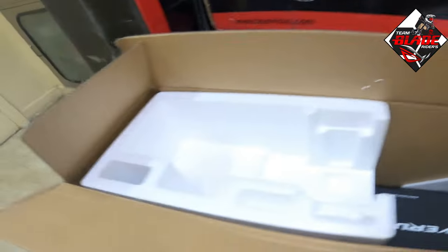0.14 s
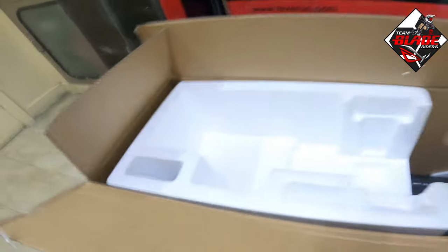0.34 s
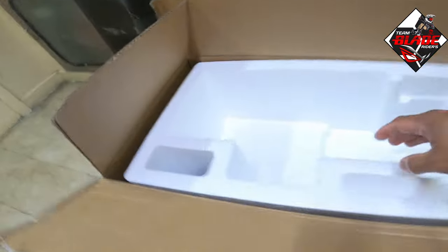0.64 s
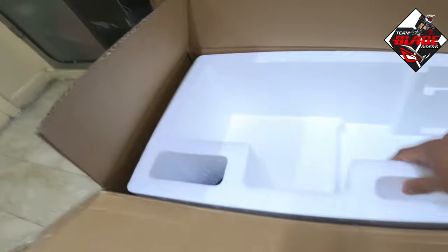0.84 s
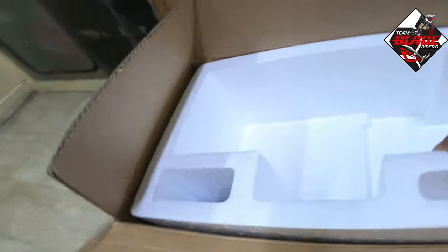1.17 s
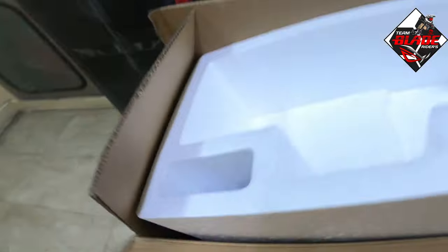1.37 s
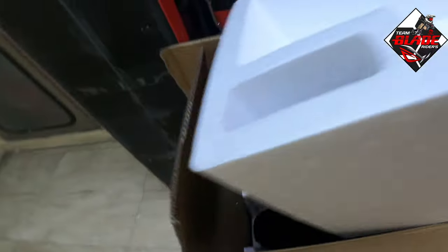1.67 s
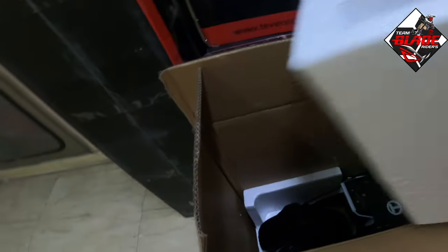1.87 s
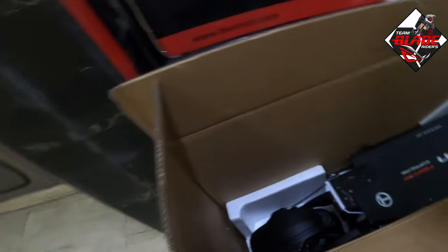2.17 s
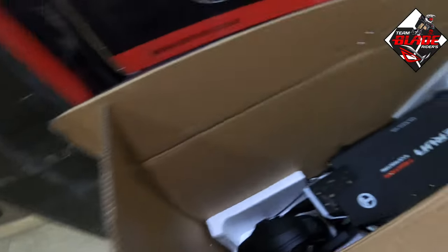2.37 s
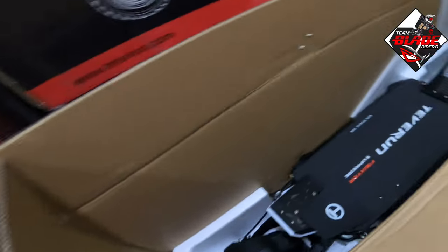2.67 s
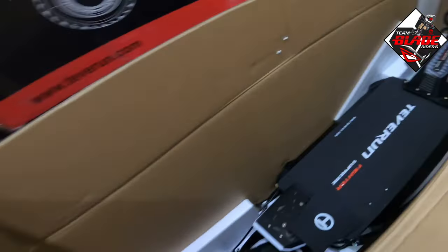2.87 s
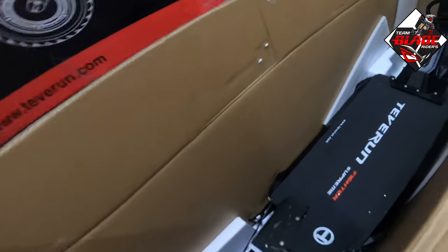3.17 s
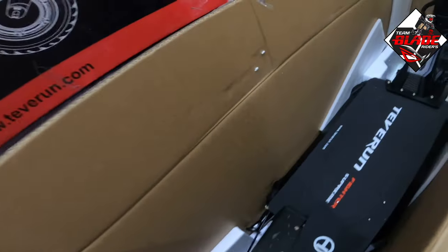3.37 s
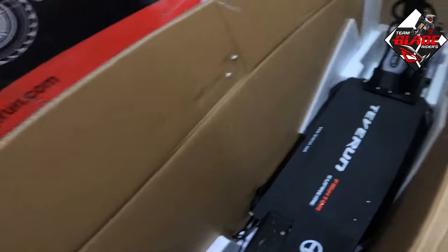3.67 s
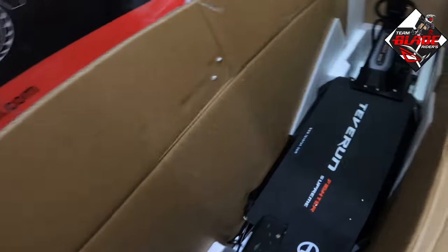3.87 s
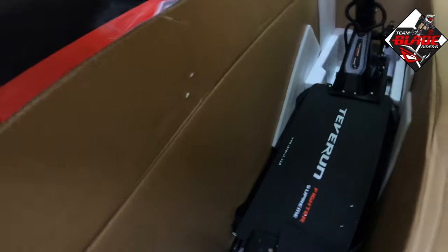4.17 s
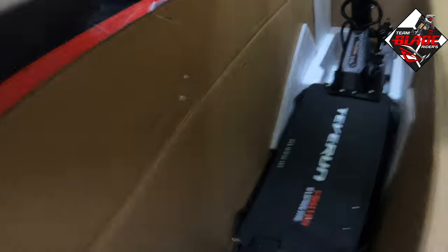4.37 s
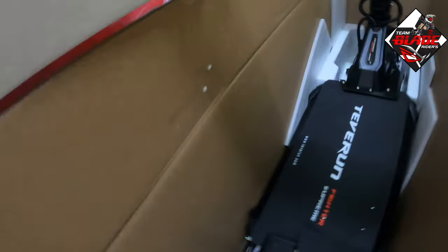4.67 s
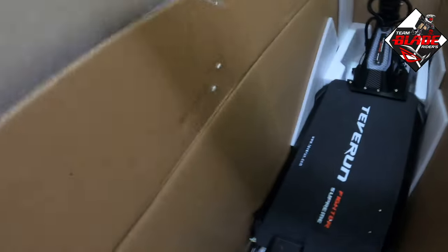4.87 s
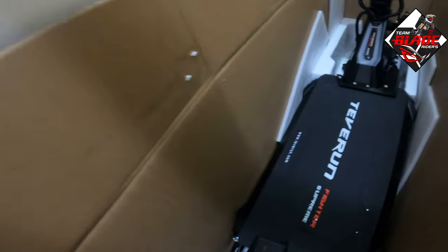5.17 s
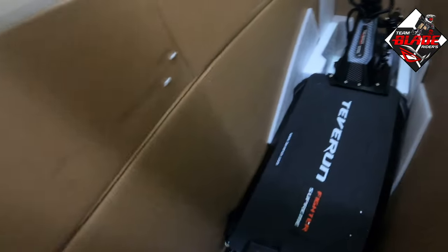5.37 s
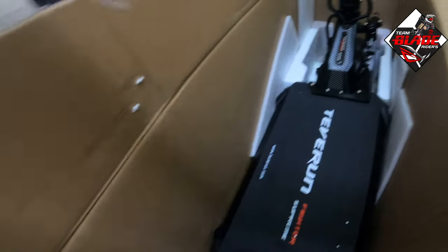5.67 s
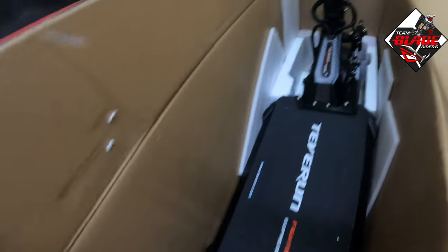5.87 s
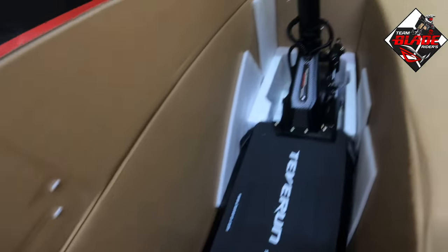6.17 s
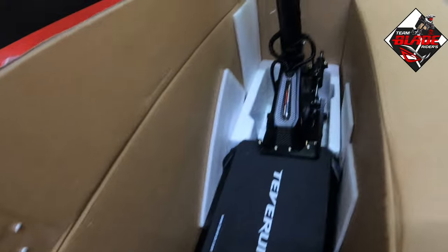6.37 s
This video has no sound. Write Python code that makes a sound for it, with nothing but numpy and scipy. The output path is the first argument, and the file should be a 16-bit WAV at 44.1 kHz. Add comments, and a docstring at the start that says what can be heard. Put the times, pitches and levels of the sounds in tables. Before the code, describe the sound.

Close microphone in a bare, echoing room with low rumble and faint hum. Small cardboard rubs and a bead tick begin, then a foam tray is dragged from a box with gritty, squeaky rasping and dull bumps. Soft swishes follow as it is carried aside. Loud hollow knocks land in two clusters near the end, rocking and rattling before the room settles.

```python
"""A bare, echoing room with a low rumble and a faint hum, heard through one close microphone.
A polystyrene foam tray is gripped, dragged up out of a cardboard box, carried aside and put down.
Dragging is grainy slip noise through foam and cardboard resonances; light slides are soft swishes.
Knocks are decaying tray modes with rattle, crack and a push of air; single beads snap as short ticks."""
import sys
import numpy as np
from scipy import signal
from scipy.fft import rfft, irfft
from scipy.io import wavfile

SR = 44100
rng = np.random.default_rng(int(sys.argv[2]) if len(sys.argv) > 2 else 0)


def digitize_waveform(pressure):
    """Quantize a signal to 16-bit integers and store it at the path in sys.argv[1].

    Rows of a 2-D input are taken as channels; values are limited to [-1, 1].
    """
    field = np.atleast_2d(pressure).T
    bounded = np.clip(field, -1, 1)
    quanta = np.round(bounded * 32767).astype(np.int16)
    wavfile.write(sys.argv[1], SR, quanta)


N = 287697
TIME = np.arange(N) / SR


def amp(db):
    """Decibels to gain."""
    return 10 ** (np.asarray(db) / 20)


def unit(x):
    """Scales to rms 1."""
    return x / np.sqrt(np.mean(x ** 2) + 1e-20)


def read(points, hz):
    """Joins (frequency, value) points on a log-frequency axis."""
    f, value = np.transpose(points)
    return np.interp(np.log(hz + 1), np.log(f + 1), value)


def add(mix, s, sound):
    """Mixes a sound in at time s, cut off at the end of the mix."""
    part = mix[round(s * SR):][:len(sound)]
    part += sound[:len(part)]


def colour(x, points):
    """Filters x with an equaliser curve, at rms 1."""
    gain = amp(read(points, np.fft.rfftfreq(len(x), 1 / SR)))
    return unit(irfft(rfft(x) * gain, len(x)))


def ring(x, modes):
    """Passes x through parallel resonances, each filtered twice for steepness, at rms 1."""
    out = np.zeros(len(x))
    for hz, width, db in modes:
        peak = np.concatenate(signal.iirpeak(hz, hz / width, SR))
        out += amp(db) * signal.sosfilt([peak] * 2, x)
    return unit(out)


def glide(x, hz, width):
    """A twofold resonance that follows the frequency curve hz, at rms 1."""
    turn = np.exp(2j * np.pi * np.cumsum(hz) / SR)
    r = np.exp(-np.pi * width / SR)
    return unit((turn * signal.lfilter([1], np.poly([r, r]), x / turn)).real)


def wander(per_s):
    """Random drift of rms 1, joining per_s random points a second with straight lines."""
    knots = np.arange(0, N + SR, SR / per_s)
    return unit(np.interp(np.arange(N), knots, rng.standard_normal(len(knots))))


def swell(s, db, rise_s, fall_s):
    """A gain that grows to its peak at time s and dies away."""
    return amp(db) * np.exp(-np.maximum((s - TIME) / rise_s, (TIME - s) / fall_s))


def grains(per_s, spread_db):
    """Tiny slips of uneven size at random moments."""
    slips = rng.standard_normal(N) * (rng.random(N) < per_s / SR)
    return slips * amp(spread_db * np.minimum(rng.exponential(1, N), 4))


# Blows of the tray on the box and floor, also stirring the rumble: (time [s], rattle level [dB],
# centre of the blow's spectrum [Hz], ringing relative to the rattle [dB], crack level [dB]);
# rattle and crack levels hold at onset, and all ringing is played a further 2.5 dB down
BLOWS = [(0.697, -34.5, 170, 6.5, -69), (0.961, -30.5, 103, 2, -41), (1.027, -35.5, 770, 3, -40),
         (1.113, -29, 140, 5, -39), (1.215, -33, 125, -8, -51), (1.595, -29.5, 80, -4, -35),
         (1.682, -28.5, 220, -3, -48), (1.698, -25.5, 367, 6, -59), (4.340, -16.5, 120, -8, -29.5),
         (4.344, -12, 331, 5, -41.5), (4.346, -16.5, 690, 2, -47), (4.356, -15, 440, 4.5, -36),
         (4.376, -28.5, 850, -2, -34.5), (4.662, -41, 1113, 1, -48), (4.898, -10.5, 187, 7.5, -32),
         (4.985, -16.5, 232, 10, -31.5), (5.186, -22.5, 120, -4.5, -43), (5.215, -29, 131, 0, -39.5),
         (5.316, -18.5, 764, 0, -36), (5.331, -13, 334, 4.5, -41), (5.336, -11.5, 118, 6, -50),
         (5.455, -31, 298, -1, -40.5), (5.541, -22.5, 704, -7.5, -58)]
RUMBLE_DB, SETTLE_S, SETTLE_DB = -42, 5.61, -4  # the rumble sinks once the handling stops
SHAKE_DB, SHAKE_S, SHAKE_BELOW_HZ = -11.5, 0.085, 250  # relative to the rattle; decay time; which blows
LIFT_S, LIFT_DB, LIFT_RISE_S, LIFT_FALL_S = 1.65, -39, 1.3, 0.38  # the box rumbles more during the lift


def rumble_level():
    """Steady while the tray is handled, stirred by the lift and each low blow, quieter at rest."""
    steady = amp(RUMBLE_DB + SETTLE_DB * np.clip((TIME - SETTLE_S) / 0.38, 0, 1))
    shakes = [swell(s, db + SHAKE_DB, 0.0027, SHAKE_S) for s, db, hz, *_ in BLOWS if hz < SHAKE_BELOW_HZ]
    shakes.append(swell(LIFT_S, LIFT_DB, LIFT_RISE_S, LIFT_FALL_S))
    return np.sqrt(steady ** 2 + sum(shake ** 2 for shake in shakes))


# Spectrum of the low rumble: (frequency [Hz], relative level [dB per Hz])
RUMBLE_SPECTRUM = [(8.8, -27), (15, -6.5), (42, 0.5), (70, -8), (97, 0.5), (109, -7), (123, -13.5),
                   (162, -9), (227, -18.5), (275, -26.5), (330, -26.5), (430, -39), (730, -120)]
# Spectrum of the still air: (frequency [Hz], relative level [dB per Hz])
AIR_SPECTRUM = [(100, -23.5), (280, -4), (500, -3), (850, -5), (1230, -4), (1900, -17.5), (4000, -22),
                (8500, -28.5), (11000, -38), (15000, -51)]
AIR_DB, HUM_DB, HISS_DB = -68.5, -71, -73


def background():
    """Low rumble, still air and a faint, slightly wavering hum in its own narrow hiss."""
    rumble = colour(rng.standard_normal(N), RUMBLE_SPECTRUM)
    rumble *= rumble_level() * amp(0.27 * wander(per_s=12))
    air = amp(AIR_DB) * colour(rng.standard_normal(N), AIR_SPECTRUM)
    hum_hz = 729 + wander(per_s=20)
    hum = amp(HUM_DB) * unit(np.sin(2 * np.pi * np.cumsum(hum_hz) / SR))
    hiss = amp(HISS_DB) * ring(rng.standard_normal(N), [(766, 100, 0)])
    return rumble + air + hum + hiss


# Reverberation of the bare room: (frequency [Hz], time to fall 60 dB [s])
ROOM_DECAY = [(60, 0.41), (200, 1.25), (600, 0.81), (2000, 1.124), (4000, 1.16), (8000, 0.9), (15000, 0.68)]


def room(x):
    """Diffuse echo of bare walls: a noise tail whose bands die at their own speeds."""
    hz, t, z = signal.stft(rng.standard_normal(2 * SR), SR, nperseg=256)
    decay = amp(-60 * t / read(ROOM_DECAY, hz)[:, None])
    tail = signal.istft(z * decay, SR, nperseg=256)[1]
    tail *= np.minimum(np.arange(len(tail)) / SR / 0.014, 1)  # the echo builds up over 14 ms
    return signal.fftconvolve(x, tail / np.linalg.norm(tail))[:N]


# Beads snapping: (time [s], tick level, played 9 dB down [dB], centre frequency [Hz],
# level sent to the room relative to the tick [dB])
BEAD_SNAPS = [(0.223, -20, 3200, 1.5), (.369, -42, 7600, -12), (1.836, -30, 7400, -28),
              (1.877, -16, 7100, -33), (3.168, -30.5, 3700, 11.5)]


def snaps():
    """Single beads let go with a tick of band-limited click, some near, some mostly heard as echo."""
    near, far = np.zeros(N), np.zeros(N)
    for s, db, hz, room_db in BEAD_SNAPS:
        band = signal.butter(2, [hz * 0.46, min(hz * 1.31, SR / 2.5)], "bandpass", fs=SR)
        tick = signal.lfilter(*band, signal.unit_impulse(256))
        tick *= amp(db - 9.0) / abs(tick).max()
        add(near, s, tick)
        add(far, s, tick * amp(room_db))
    return near + room(far)


# Spectrum of the soft swish: (frequency [Hz], relative level [dB per Hz])
SWISH_SPECTRUM = [(180, -47), (300, 0), (559, -4.5), (714, 0.5), (884, -3), (1170, 2), (1910, -2),
                  (2400, -1.5), (3550, -2), (6400, -9.5), (8600, -11), (15000, -32.5)]
# Light slides while the tray is handled, carried and lowered:
# (time [s], length [s], peak level before treble tilt [dB], treble tilt [dB])
LIGHT_SLIDES = [(0.143, 0.11, -65, 4), (0.527, 0.22, -66.5, -4), (0.812, .19, -51, -3),
                (1.987, 0.094, -51, -3.5), (2.13, 0.32, -50, 3), (2.317, 0.5, -52, 0.5),
                (2.967, 0.16, -61.5, 0), (3.123, 0.12, -68, 0), (3.484, 0.18, -52.5, 4.5),
                (3.793, 0.31, -50, -7), (4.203, 0.15, -40.5, -12), (4.298, 0.084, -38, 3),
                (4.839, 0.29, -52.5, 8.5), (5.246, 0.11, -41.5, -1.5), (5.371, 0.17, -50.5, -12)]
SWISH_PEAK, SWISH_ARCH = 0.45, 1.38  # share of a slide spent speeding up; sharpness of its arch
HOLD_DB, HOLD_END_S = -70, 5.4  # faint creep of the foam for as long as it is held


def slide():
    """Under light pressure the slips are fine and even: a soft swish, tinted by the tray's hollows."""
    slips = grains(per_s=14000, spread_db=0.0) * amp(1.5 * wander(per_s=93))
    hollows = ring(slips, [(1167, 113, -2), (2360, 230, 0), (3510, 180, -1.8)])
    swish = colour(slips, SWISH_SPECTRUM) + amp(-27.5) * hollows
    treble = signal.lfilter(*signal.butter(1, 5000, "highpass", fs=SR), swish)
    out = amp(HOLD_DB) * swish * np.clip((HOLD_END_S - TIME) / 0.12, 0, 1)
    for s, length, db, tilt_db in LIGHT_SLIDES:  # each speeds up and slows down in one arch
        span = slice(round(s * SR), round((s + length) * SR))
        progress = np.interp(TIME[span], [s, s + SWISH_PEAK * length, s + length], [0, 0.5, 1])
        speed = np.sin(np.pi * progress) ** SWISH_ARCH
        tilted = swish[span] + (amp(tilt_db) - 1) * treble[span]
        add(out, s, amp(db) * speed * tilted)
    return out


# Short chattering rubs: (time [s], length [s], slip rate [per s], cardboard level [dB],
# foam level [dB], squeak level [dB], squeak frequency [Hz])
CHATTERS = [(0.412, 0.4, 167, -51.5, -87, -66, 1640), (0.521, 0.16, 170, -46, -78, -68, 1700),
            (0.585, 0.043, 150, -48, -71.5, -53.5, 1650), (0.861, 0.11, 460, -53.5, -44.5, -51.5, 4350),
            (0.916, 0.073, 270, -47, -46, -45.5, 1320), (4.254, 0.15, 540, -40, -54.5, -40, 610),
            (5.257, 0.048, 380, -36, -43, -41, 1590)]
# Cardboard resonances: (frequency [Hz], width of each filter pass [Hz], relative level [dB])
CARDBOARD_MODES = [(264, 103, 11), (767, 127, 7.5), (1260, 130, -15), (1650, 540, -12.5), (2860, 490, -23),
                   (6020, 3800, -38)]
# Foam resonances: (frequency [Hz], width of each filter pass [Hz], relative level [dB])
FOAM_MODES = [(1370, 640, 9), (1850, 420, 4.5), (3240, 890, 9.5), (4180, 400, 5), (7400, 4000, -7)]


def rubs():
    """Uneven stick-slip pulses ring the cardboard wall and the foam; the contact itself squeaks."""
    out = np.zeros(N)
    for s, length, slips_hz, wall_db, foam_db, squeak_db, squeak_hz in CHATTERS:
        size = round(length * SR)
        slip_rate = slips_hz * np.exp(0.35 * wander(per_s=180)[:size])
        turns = np.cumsum(slip_rate) / SR
        # noise that jumps up at each slip and sags until the next
        force = np.exp(-(turns % 1) / 0.76) * rng.standard_normal(SR)[:size]
        body = amp(wall_db) * ring(force, CARDBOARD_MODES) + amp(foam_db) * ring(force, FOAM_MODES)
        squeak = amp(squeak_db) * ring(force, [(squeak_hz, 120 + 0.036 * squeak_hz, 0)])
        add(out, s, (body + squeak) * signal.windows.tukey(size, 0.6))
    return out


def in_box(x):
    """Close cardboard walls smear each slip over a few milliseconds."""
    t = np.arange(512) / SR
    walls = rng.standard_normal(len(t)) * np.exp(-t / 0.0025)
    walls = irfft(np.exp(1j * np.angle(rfft(walls))))  # the same strength at every pitch
    return signal.oaconvolve(x, walls)[:N]


# Tugs that drag the foam up the cardboard: (time [s], length [s], friction force [dB])
DRAG_TUGS = [(1.034, 0.051, -37), (1.086, 0.066, -31), (1.16, 0.074, -31), (1.243, 0.23, -29),
             (1.522, 0.073, -34.5), (1.592, 0.1, -32.5), (1.723, 0.073, -33)]
TUG_ATTACK_S, TUG_RELEASE_S = 0.02, 0.02


def tug_force():
    """Each tug takes hold quickly, keeps its force and lets go; overlapping tugs add in power."""
    power = np.zeros(N)
    for s, length, db in DRAG_TUGS:
        attack = np.clip((TIME - s) / TUG_ATTACK_S, 0, 1)
        release = np.exp(-np.maximum(TIME - s - length, 0) / TUG_RELEASE_S)
        power += (amp(db) * attack * release) ** 2
    return np.sqrt(power)


# Spectrum of the foam's rasp: (frequency [Hz], relative level [dB per Hz])
RASP_SPECTRUM = [(290, -34), (500, -24), (839, -1.5), (954, -5.5), (1330, 1), (1770, -2.5), (4020, 1.5),
                 (4380, -4.5), (4700, 0.5), (5200, -3), (8600, -10.5), (11500, -16), (15500, -42)]
# Foam resonances under drag: (frequency [Hz], width of each filter pass [Hz], relative level [dB])
DRAG_SQUEAKS = [(1339, 33, -11.5), (1890, 200, -14), (3160, 230, -14), (4273, 220, -9.5),
                (8400, 730, -18.5)]
# The box wall bends under the hand, then as the tray comes free:
# (peak time [s], level [dB], rise time [s], fall time [s])
WALL_FLEXES = [(.56, -46, 0.034, 0.032), (.69, -43.5, .04, 0.082), (1.704, -29, 0.067, 0.073)]
FIZZ_DB, FIZZ_FOLLOWS = -31.5, 0.58  # bead fizz at 0 dB force, and its dB per dB of force
WALL_DB = -17  # wall grumble relative to the friction force


def drag():
    """Foam beads catch and slip in clumps along the wall, which flexes and grumbles."""
    catch = amp(1.1 * wander(per_s=200))
    slips = in_box(grains(per_s=12000, spread_db=1.3)) * catch
    rasp = colour(slips, RASP_SPECTRUM) * amp(-2.5)
    for hz, width, db in DRAG_SQUEAKS:  # the resonances come and go as the contact moves
        moving_hz = hz * np.exp(0.05 * wander(per_s=70))
        squeak = glide(slips, moving_hz, width) * amp(3 * wander(per_s=110))
        rasp += amp(db - 6.5) * unit(squeak)
    fizz = colour(slips, [(2000, -43), (4000, -26), (8000, -3), (11000, -11.5), (15500, -18)])
    wall_slips = grains(per_s=630, spread_db=-1.0)
    wall = colour(wall_slips, [(100, 3.5), (240, 2), (750, -8.5), (1400, -39.5), (6000, -59)])
    force = tug_force()
    flex = amp(WALL_DB) * force + sum(swell(*row) for row in WALL_FLEXES)
    return rasp * force + fizz * amp(FIZZ_DB) * force ** FIZZ_FOLLOWS + wall * flex


# Modes of the hollow tray: (frequency [Hz], relative level [dB], time to fall 60 dB [s])
TRAY_MODES = [(68.3, -2.5, 0.74), (95.1, 0.5, 0.25), (122.6, 4.5, 0.17), (175, -2.5, 0.068),
              (216.6, 1.5, 0.13), (312.5, 1, 0.076), (422.6, -6.5, 0.19), (459, -5, 0.13), (668, -2, 0.11),
              (766, 2.5, 0.029), (939, -4, 0.1), (1206, -7.5, 0.013), (1405, -11.5, 0.04), (1620, -17, .04)]
# Spectrum of crushed beads: (frequency [Hz], relative level [dB per Hz])
CRACK_SPECTRUM = [(300, -12.5), (1000, 12), (3200, -20), (5500, -8.5), (9000, -14), (12000, -19.5),
                  (15000, -43)]


def knock(db, centre_hz, rattle_db, crack_db, push_db):
    """A broad soft blow wakes the low modes, a corner the high ones; crushed beads add a crack."""
    t = np.arange(16384) / SR
    hz, mode_db, t60 = np.transpose(TRAY_MODES)
    weight = amp(mode_db - 4.4 * abs(np.log2(hz / centre_hz)) ** 2.0)
    # neighbouring modes swing opposite ways
    weight *= (-1) ** np.arange(len(hz)) / np.linalg.norm(weight)
    modes = weight @ (np.sin(2 * np.pi * hz[:, None] * t) * amp(-60 * t / t60[:, None]))
    rattle_curve = [(centre_hz / 5, -16), (centre_hz, 0), (centre_hz * 1.41, -9),
                    (centre_hz * 7, -32), (20000, -75)]
    rattle = colour(rng.standard_normal(len(t)), rattle_curve)
    rattle_t60 = 0.13 * (200 / centre_hz) ** 0.5  # high rattles die sooner
    crack = colour(rng.standard_normal(len(t)), CRACK_SPECTRUM)
    noise = amp(rattle_db - 60 * t / rattle_t60) * rattle + amp(crack_db - 60 * t / 0.097) * crack
    push = np.sin(2 * np.pi * 62 * t) * np.exp(-t / 0.0047)  # the flat face shoves the air once
    onset = 1 - np.exp(-t / 0.00034)
    return amp(db - 2.5) * modes + (noise + amp(push_db) * push) * onset


# air shoved by a blow centred on 150 Hz, relative to its rattle; smaller, higher contacts shove less
PUSH_DB, PUSH_DB_PER_OCTAVE = 1.5, -7.5


def knocks():
    """The tray bumps the box, then lands and rocks on the floor."""
    out = np.zeros(N)
    for s, db, centre_hz, ring_db, crack_db in BLOWS:
        push_db = db + PUSH_DB + PUSH_DB_PER_OCTAVE * np.log2(centre_hz / 150)
        add(out, s, knock(db + ring_db, centre_hz, db, crack_db, push_db))
    return out


def scene():
    """All sources in the room, the same in both channels."""
    friction, blows, swish = drag() + rubs(), knocks(), slide()
    # the room returns the treble of the blows more strongly than their boom
    boom = signal.lfilter(*signal.butter(1, 600, fs=SR), blows)
    blows_to_room = amp(-15.5) * boom + amp(-6) * (blows - boom)
    echo = room(amp(-11.5) * friction + blows_to_room + amp(-3.0) * swish)
    mono = friction + blows + swish + echo + snaps() + background()
    return np.array([mono, mono])


EDGE_HZ = 15700


def record(dry):
    """The recorder's band limit: a steep low-pass."""
    low_pass = signal.firwin(511, EDGE_HZ, window=("kaiser", 9), fs=SR)
    return signal.oaconvolve(dry, low_pass[None], "same")


dry = scene()
out = record(dry)
digitize_waveform(out)
```